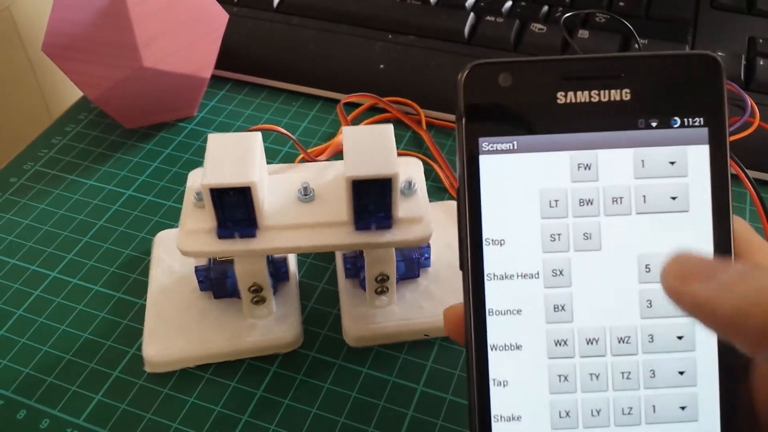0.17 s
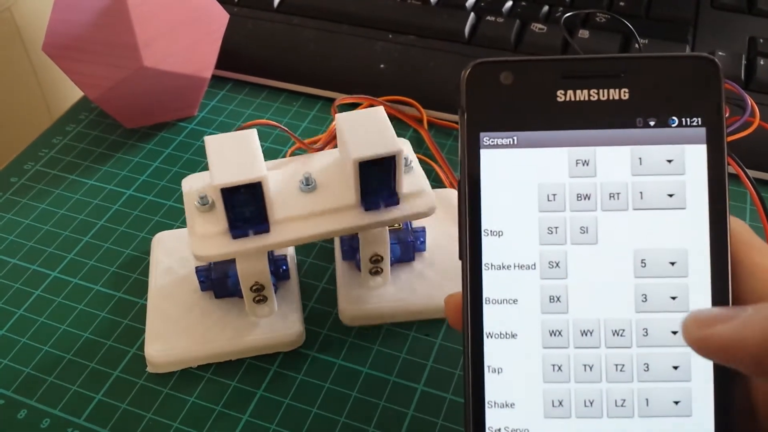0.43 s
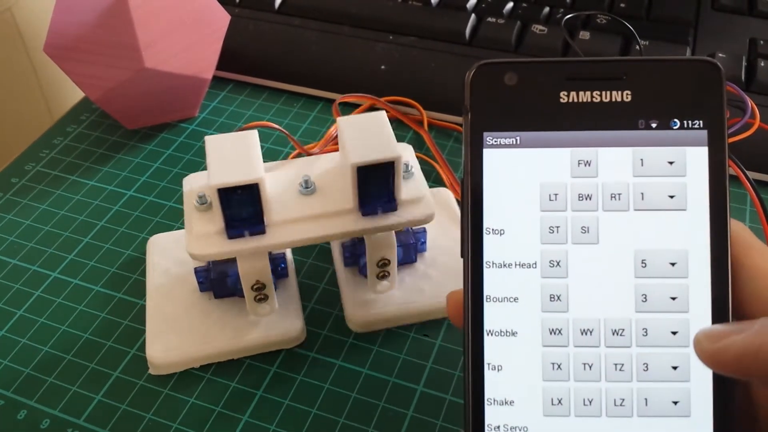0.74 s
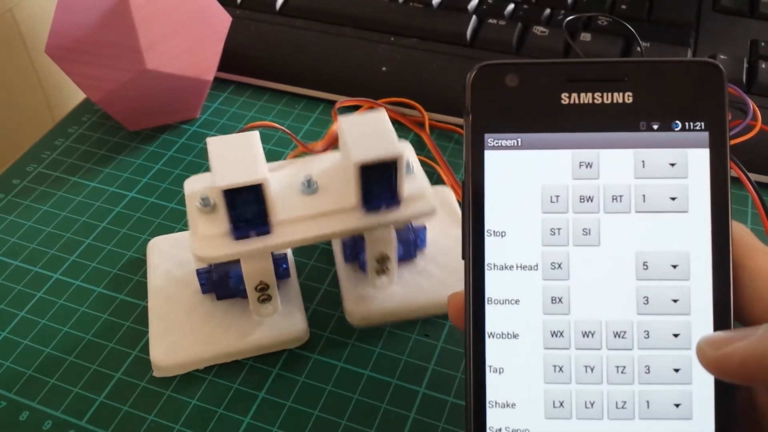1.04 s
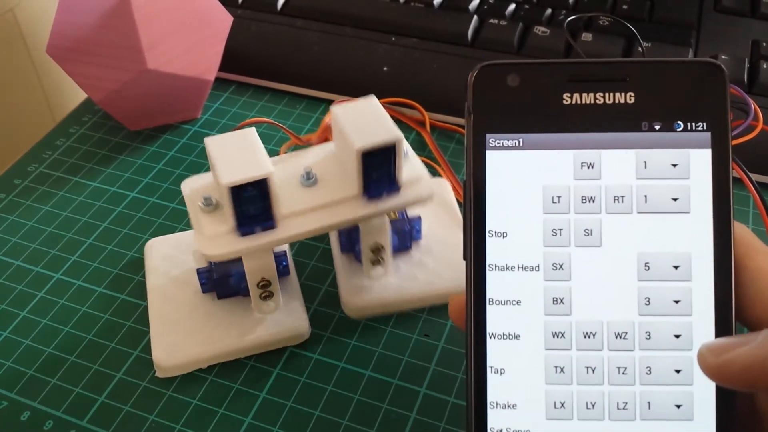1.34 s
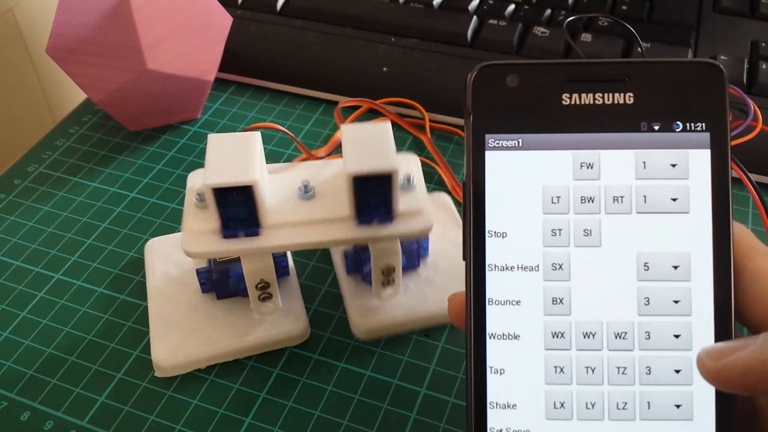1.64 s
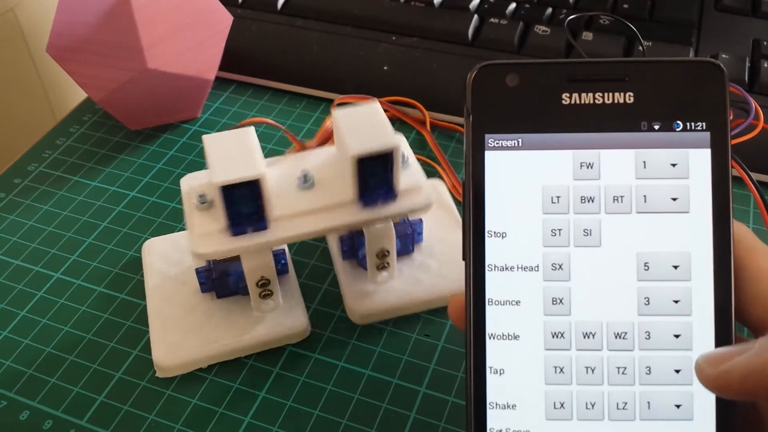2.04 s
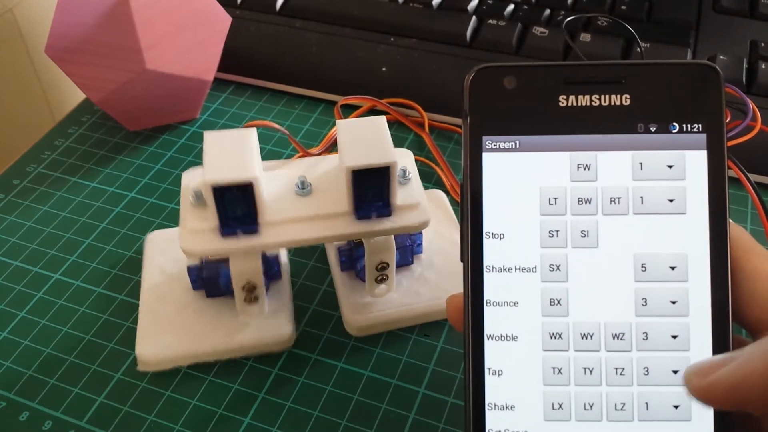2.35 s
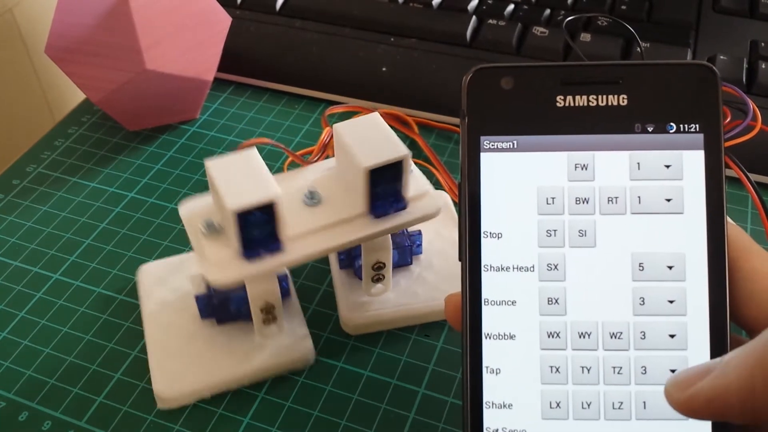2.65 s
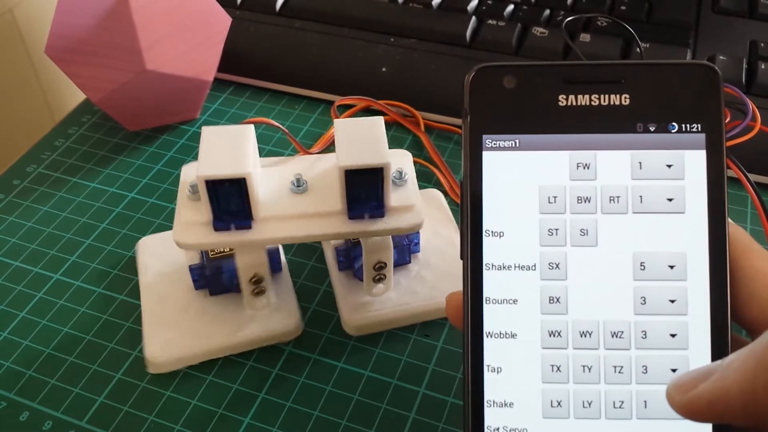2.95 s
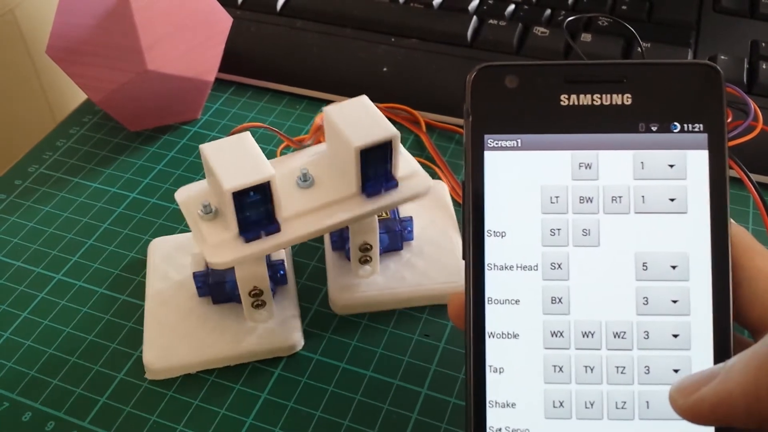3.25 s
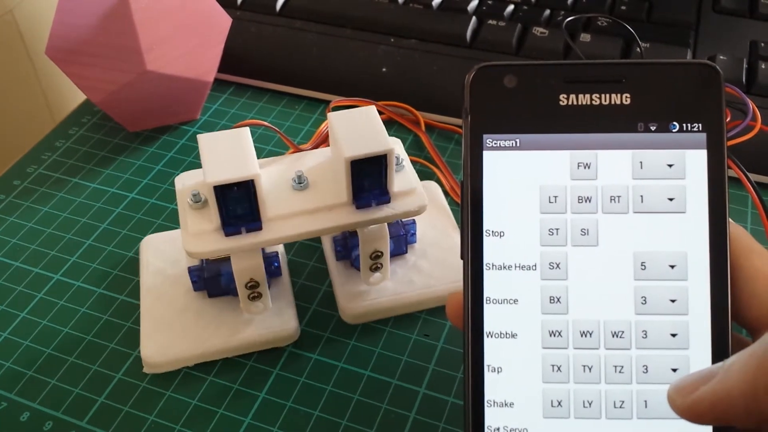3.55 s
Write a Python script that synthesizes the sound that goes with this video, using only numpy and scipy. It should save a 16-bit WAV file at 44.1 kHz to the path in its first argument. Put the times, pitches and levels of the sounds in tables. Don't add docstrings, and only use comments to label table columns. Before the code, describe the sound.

Small servos in a plastic robot whir in quick alternating strokes, bright and gritty, with faint joint knocks and one harder clack past the middle, then stop with a snap; close stereo microphone, quiet room with faint fan hum.

```python
import sys
import numpy as np
from scipy import signal
from scipy.fft import rfft, irfft
from scipy.io import wavfile
from scipy.ndimage import uniform_filter1d

SR = 44100
rng = np.random.default_rng(int(sys.argv[2]) if len(sys.argv) > 2 else 0)


def natural_amplitude(level_db):
    exponent = np.asarray(level_db, float) / 20
    return 10 ** exponent


def digitize_waveform(pressure):
    field = np.atleast_2d(pressure).T
    bounded = np.clip(field, -1, 1)
    quanta = np.round(bounded * 32767).astype(np.int16)
    wavfile.write(sys.argv[1], SR, quanta)


N = 163170


def at(points, x):
    return np.interp(x, *np.transpose(points))


def rms_one(x):
    return x / np.sqrt(np.mean(x ** 2) + 1e-20)


def drift(rate):
    r = np.exp(-16 * np.pi * rate / SR)
    slow = signal.lfilter([1], [1, -2 * r, r * r], rng.standard_normal(N // 8 + 4002))[4000:]
    return np.interp(np.arange(N) / 8, np.arange(len(slow)), rms_one(slow))


def resonate(x, hz, width_hz, phase=0.):
    r = np.exp(-np.pi * width_hz / SR)
    w = 2 * np.pi * hz / SR
    onset = [np.sin(phase), r * np.sin(w - phase)]
    return 2 * (1 - r) * signal.lfilter(onset, [1, -2 * r * np.cos(w), r * r], x + 1e-18)


def filtered(x, order, hz, kind):
    return signal.sosfilt(signal.butter(order, hz, kind, fs=SR, output="sos"), x)


def room_hum():
    # time in seconds, level in dB.
    room_level = [(0, -66), (.14, -66), (.3, -57.5), (1.2, -57), (2.3, -54.5), (2.7, -55), (3.7, -57.5)]
    # frequency in Hz, noise colour in dB per Hz.
    room_colour = [(15, -64), (25, -15.5), (91, -3.5), (225, -1.5), (257, 1), (293, -6.5), (403, -9),
                   (554, -21), (14000, -24.5)]
    # fan tone in Hz, level in dB.
    fan_tones = [(91.5, -70.5), (150.7, -64.5), (247.6, -77), (398.4, -67)]
    likeness, wobble_db, patchy_db, pan_db = 0.44, 0.5, 2.5, 0.9
    t = np.arange(N) / SR
    hz = np.fft.rfftfreq(N, 1 / SR) + 1
    shared, left, right = rng.standard_normal((3, N))
    white = np.sqrt(likeness) * shared + np.sqrt(1 - likeness) * np.array([left, right])
    colour = natural_amplitude(at([(np.log(f), db) for f, db in room_colour], np.log(hz)))
    noise = rms_one(irfft(rfft(white) * colour, N))

    tones = np.zeros(N)
    for f, db in fan_tones:
        level = natural_amplitude(db + 3.5 + wobble_db * drift(6.3))
        tones += level * np.sin(2 * np.pi * f * t + 0.52 * drift(9))

    level_db = at(room_level, t)
    swell = natural_amplitude(1.2 * (level_db - level_db.mean()))
    both = natural_amplitude(level_db + patchy_db * drift(1.5)) * noise + swell * tones
    return both * natural_amplitude(np.array([[pan_db], [-pan_db]]))


def knocks():
    # start in seconds, peak in dB, ring in Hz.
    hits = [(0.147, -53.5, 880), (0.211, -66, 2360), (0.391, -42.5, 2180), (1.016, -58, 2160),
            (1.085, -57, 2190), (1.194, -53, 2230), (1.395, -56, 2120), (1.852, -53, 2300),
            (2.281, -25, 1860), (2.335, -31, 895), (2.634, -57, 2200), (3.173, -53, 2380),
            (3.251, -63, 2220)]
    # start in seconds, level in dB.
    snaps = [
        (0.1581, -46),
        (3.657, -28),
        (3.661, -40),
    ]
    crack_share, crack_s, ring_t60_s = 0.9, 0.0065, 0.02
    thud_hz, thud_db, thud_t60_s = 670, -14.5, 0.11
    bump_hz, bump_db = 127, -22.5
    out = np.zeros(N + SR)
    age = np.arange(SR // 10) / SR
    for s, db, hz in hits:
        burst = rng.standard_normal(len(age)) * np.exp(-age / crack_s)
        crack = resonate(burst, hz, 0.69 * hz)
        ring = natural_amplitude(-60 * age / ring_t60_s) * np.sin(2 * np.pi * hz * age)
        thud = natural_amplitude(thud_db - 60 * age / thud_t60_s) * np.sin(2 * np.pi * thud_hz * age)
        bump = natural_amplitude(bump_db - 30 * age / thud_t60_s) * np.sin(2 * np.pi * bump_hz * age)
        knock = 3.45 * crack_share * crack + (1 - crack_share) * ring + thud + bump
        out[int(s * SR):][:len(age)] += natural_amplitude(db) * knock
    for s, db in snaps:
        burst = rng.standard_normal(len(age)) * np.exp(-age / 0.00096)
        out[int(s * SR):][:len(age)] += natural_amplitude(db) * resonate(burst, 12000, 4000)
    return out[:N]


def control_kicks():
    frame_s, first_kick_s = 0.01999, 0.1565
    rise_s, fall_s, spread_db = 0.0016, 0.003, 2.5
    since = np.arange(N) / SR - first_kick_s
    index = np.maximum(since // frame_s, 0).astype(int)
    age = since % frame_s
    strength = natural_amplitude(spread_db * rng.standard_normal(400))[index]
    return (since > 0) * strength * (1 - np.exp(-age / rise_s)) * np.exp(-age / fall_s)


def motion():
    # start in seconds, length in seconds, level in dB, brightness in dB per octave.
    strokes = [(0.186, 0.16, -26.5, 1), (0.347, .16, -20, -0.5), (0.498, 0.21, -25.5, -3),
               (0.679, .14, -21.5, 3), (0.813, 0.19, -27.5, -1.5), (1.01, .16, -20, 3),
               (1.15, 0.18, -25.5, -6.5), (1.335, .15, -19.5, 1), (1.557, .11, -23.5, -1.3),
               (1.67, 0.15, -19, 0), (1.783, 0.22, -27, -8.5), (1.991, 0.16, -20, 0.5),
               (2.122, 0.12, -31.5, 0.5), (2.205, 0.016, -24, 9.5), (2.241, 0.035, -18.5, 7.8),
               (2.248, 0.11, -22.5, -3.5), (2.349, 0.096, -21, -1), (2.415, 0.12, -20.5, -2.5),
               (2.476, 0.17, -27.5, -4), (2.647, .15, -20, 2.5), (2.811, 0.17, -28.5, -3.5),
               (2.984, .16, -21, 3.5), (3.144, 0.17, -25, -3), (3.311, .15, -20, 0),
               (3.557, 0.091, -41.5, -4.5)]
    t = np.arange(N) / SR
    power, tilt = np.full(N, 1e-12), np.zeros(N)
    for start, length, db, bright in strokes:
        speed = np.sin(np.pi * np.clip((t - start) / length, 0, 1)).clip(0)
        part = (natural_amplitude(db) * speed) ** 2
        power += part
        tilt += bright * part
    return np.sqrt(power), tilt / power


def gear_force():
    # time in seconds, kick strength in dB while the motors hunt for their place.
    hunting = [(.15, -36), (.3, -33), (1.3, -28), (1.55, -30.5), (2.6, -23.5), (3.3, -25), (3.5, -34.5),
               (3.66, -30), (3.68, -55)]
    throb_share, grit_db, grit_per_s = 0.15, -0.5, 270
    force, tilt = motion()
    kick = control_kicks()
    throb = uniform_filter1d(kick, size=160)
    force = force * (1 - throb_share + throb_share * throb)
    force = force + 2 * kick * natural_amplitude(at(hunting, np.arange(N) / SR))
    return force * natural_amplitude(grit_db * drift(grit_per_s)), tilt


def housing(force, tilt):
    # resonance in Hz, width in Hz, right level in dB, left level in dB, left phase in radians.
    resonances = [(1520, 320, -24, -35, 21.7), (2080, 530, -29.5, -25.5, -1), (3410, 270, -8.5, -8.5, 3.5),
                  (3987, 109, -1.5, -32, -2), (4430, 340, -8.5, -10.5, -2), (5200, 205, -7.5, -10.5, -1),
                  (5730, 276, -7, -3.5, 4), (6770, 400, -30.5, -4.5, 0.4), (7280, 1270, -4.5, -12, 0.5),
                  (7740, 444, 0, -9, 2), (8640, 1460, -12.5, -14.5, 0.84), (9130, 620, -10.5, -29, 1.1),
                  (10900, 300, -18.5, -22, -1.3), (12980, 660, -11.5, -24, 0.7)]
    ticks_per_s, tick_db = 240, 3.5
    patchy_db, pose_db, likeness = 2.21, 1.4, 0.72
    ticks = 1 + (rng.random(N) < ticks_per_s / SR) * natural_amplitude(tick_db)
    near, far = rng.standard_normal((2, 2, N)) * ticks * force
    out = np.zeros((2, N))
    for k, (hz, width_hz, right_db, left_db, phase) in enumerate(resonances):
        bright_db = tilt * np.log2(hz / 6000)
        gain = natural_amplitude(bright_db + patchy_db * drift(27) + pose_db * drift(1.33) + 5.5)
        right = near[k % 2]
        left = likeness * right + np.sqrt(1 - likeness ** 2) * far[k % 2]
        out[1] += natural_amplitude(right_db) * resonate(right * gain, hz, width_hz)
        out[0] += natural_amplitude(left_db) * resonate(left * gain, hz, width_hz, phase)
    return out


def ports(x):
    # dip in Hz, width in Hz, depth from 0 to 1.
    notches = [(2657, 440, 0.52), (12000, 320, 0.4)]
    for hz, width_hz, depth in notches:
        x = x - depth * signal.lfilter(*signal.iirpeak(hz, hz / width_hz, fs=SR), x)
    cut = filtered(x, 4, 2140, "high")
    cut[0] = filtered(cut[0], 2, [470, 11600], "band")
    return cut


def table_drone(force):
    level_db = np.array([[-61], [-63]]) + 22.5
    follows = 0.29
    noise = filtered(rng.standard_normal((2, N)), 2, (476, 1900), "band")
    return noise * natural_amplitude(level_db) * uniform_filter1d(force, size=400) ** follows


def servos():
    force, tilt = gear_force()
    return ports(housing(force, tilt)) + table_drone(force)


def echoes(x):
    t60_s, echo_db = 0.31, -11
    age = np.arange(SR // 3) / SR
    tail = rng.standard_normal((2, len(age))) * natural_amplitude(-60 * age / t60_s) * (age > .004)
    tail = tail / np.sqrt(np.sum(tail ** 2, axis=1, keepdims=True))
    return natural_amplitude(echo_db) * signal.fftconvolve(x, tail, axes=1)[:, :N]


def starve(x):
    # band in Hz, overall level in dB that empties it.
    starve_at = [(0, -25), (250, -26), (480, -34), (1100, -33), (1700, -29), (1800, 0)]
    chance_db, shift = 3.5, 666
    hz, _, cells = signal.stft(np.pad(x, ((0, 0), (shift, 0))), SR, nperseg=2048)
    loud_db = 10 * np.log10(np.sum(np.abs(cells) ** 2, axis=1, keepdims=True) + 1e-16)
    chance = uniform_filter1d(rng.standard_normal((2, 257, cells.shape[2])), 3, axis=2) * 3 ** .5
    chance = np.repeat(chance, 4, axis=1)[:, :1025]
    over_db = loud_db - at(starve_at, hz)[:, None] + chance_db * chance
    thinned = cells * natural_amplitude(-np.clip(30 * over_db, 0, 60))
    return signal.istft(thinned, SR, nperseg=2048)[1][:, shift:shift + N]


def scene():
    hum = room_hum()
    robot = knocks() * natural_amplitude(np.array([[.4], [-.4]])) + servos()
    return hum + robot + echoes(robot)


def roll_off(x):
    return signal.sosfilt(signal.butter(12, 15750, fs=SR, output="sos"), x)


def record(dry):
    top_cut = signal.cheby2(16, 40, 14920, fs=SR, output="sos")
    mix = signal.sosfilt(top_cut, starve(dry))
    return roll_off(mix)


dry = scene()
out = record(dry)
digitize_waveform(out)
```